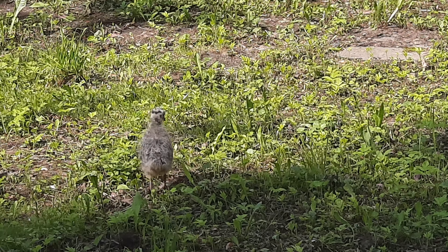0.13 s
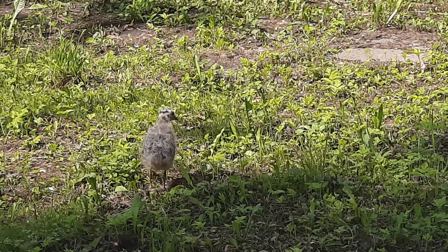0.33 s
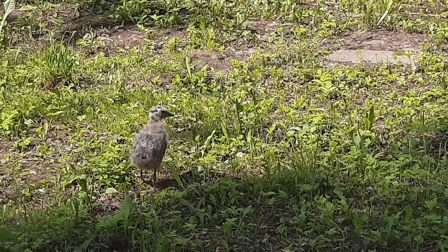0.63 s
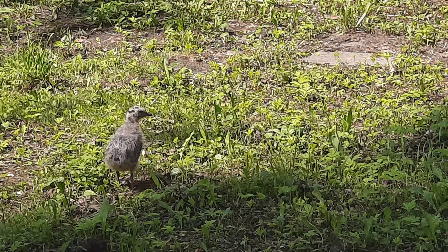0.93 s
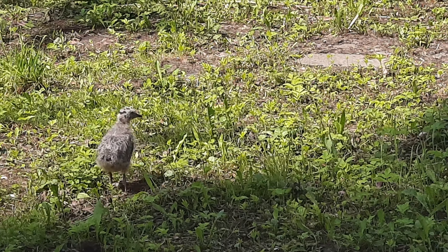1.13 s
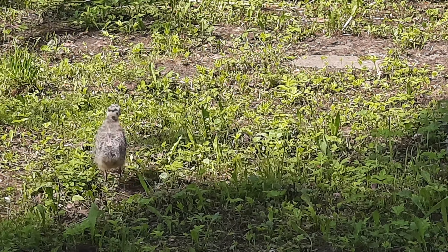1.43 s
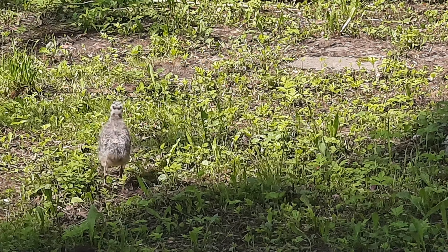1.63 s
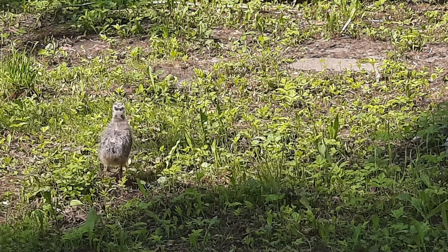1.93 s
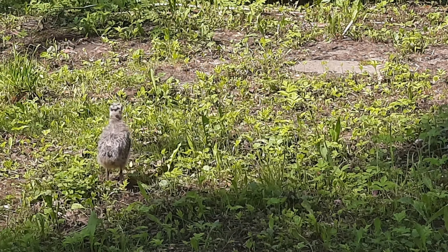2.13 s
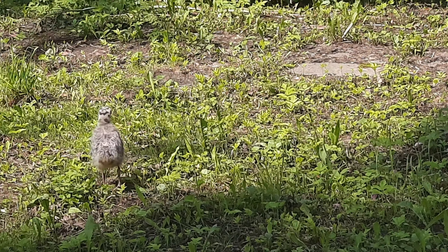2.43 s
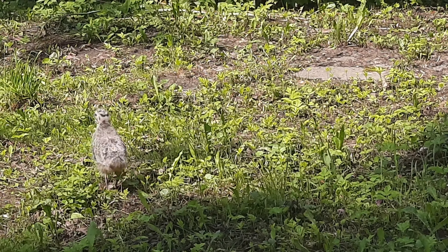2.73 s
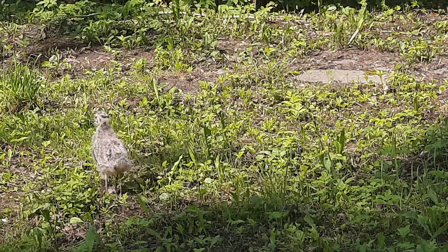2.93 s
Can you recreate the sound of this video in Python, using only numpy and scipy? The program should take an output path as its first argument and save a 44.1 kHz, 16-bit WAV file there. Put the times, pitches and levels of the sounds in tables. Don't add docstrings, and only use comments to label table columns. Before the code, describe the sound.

A gull's four harsh, gliding cries, each about 0.15-0.2 seconds, come at 0.5, 1.3, 2.0 and 2.5 seconds, with quick wall echo and a yard tail. A thin distant whistle sounds on the right at 0.9. A second gull on the left chuckles at 1.1-1.7, 2.4-2.5 and rapidly from 2.8. Low traffic rumble and hiss swell until 1.75, then hold; faint dry grass ticks come near 2.9-3.0.

```python
import sys
import numpy as np
from scipy import signal
from scipy.io import wavfile
from scipy.ndimage import uniform_filter1d, map_coordinates

SR = 44100
rng = np.random.default_rng(int(sys.argv[2]) if len(sys.argv) > 2 else 0)


def dump_mix(stems):
    frames = np.atleast_2d(stems).T
    limited = np.clip(frames, -1, 1)
    pcm = np.round(limited * 32767).astype(np.int16)
    wavfile.write(sys.argv[1], SR, pcm)


def to_linear_factor(level_db):
    exponent = np.asarray(level_db, float) / 20
    return 10 ** exponent


N = 136269

# time in seconds, pitch in Hz, effort in dB.
CRY_1 = [(.487, 1032, -39), (.495, 1107, -33), (.505, 1151, -34), (0.524, 1190, -31.5), (.531, 1235, -31.5),
         (.548, 1280, -34), (.573, 1250, -34), (.613, 990, -38), (.638, 813, -50)]
CRY_2 = [(1.288, 1098, -29), (1.3, 1249, -37.5), (1.312, 1281, -37.5), (1.346, 1333, -38),
         (1.44, 1135, -41.5), (1.452, 1067, -44), (1.47, 877, -47)]
CRY_3 = [(1.978, 1011, -55), (1.986, 1129, -38), (2.0, 1267, -35), (2.04, 1298, -34.5), (2.078, 1210, -39),
         (2.116, 1065, -43.5), (2.145, 842, -42)]
CRY_4 = [(2.522, 1056, -37), (2.532, 1207, -32.5), (2.55, 1285, -32), (2.584, 1304, -30), (2.63, 1201, -32),
         (2.663, 1082, -37), (2.672, 1010, -46.5), (2.687, 850, -32)]
# level in dB of multiple 1, 2, ..
BEAK = [(-14.5, 0, -11.5, -12.5, -7.5, -23, -24, -33.5, -28, -32, -41, -49),
        (-12, 3, -4, -12, -4, -14.5, -15.5, -32, -28, -25, -31, -35),
        (-12, 2.5, -4, -12.5, -6, -18.5, -30, -53, -36.5, -33.5, -33, -35),
        (-16, 3, -5, -15, -13.5, -21.5, -27, -48, -41, -53, -48, -54)]
# left-right in dB, dulling through it in dB per overtone, gain in dB.
FLIGHT = [(-0.5, 0, 1), (1, -0.26, 9), (1.5, -1, 6), (4, -0.3, 5.5)]
CRY_LEAD_MS = (.115, .195, .228, .128)
# frequency in Hz, left-right in dB.
BODY_SHADE = [(2700, 1), (3800, 1.5), (5000, -3.5), (6200, -3), (9000, -11.5), (13000, 6)]
# level in dB, brightness in dB per overtone, doppler ratio,
# left-right in dB, dulling in dB per overtone.
WALL = [(-19.5, 1.5, 1.002, 11, -0.5), (-11, 1, 1.005, 7, -0.6), (-9, 1.53, 1.012, 4.5, -0.6),
        (-9.5, 2.5, 1.024, 5, 0.4)]
WALL_DELAY_S = (.078, .079, .0665, .049)
# start in seconds, length in seconds, level in dB, pitch in Hz,
# brightness in dB per octave, squeak share 0-1.
CHUCKLE = [(1.141, 0.035, -47.5, 559, -1, .15), (1.225, 0.045, -48, 574, -1, 0.47),
           (1.52, 0.037, -47.5, 563, 0.5, .2), (1.574, 0.042, -47.5, 568, -0.5, 0.34),
           (1.629, 0.043, -51.5, 546, -2, 0.7), (2.403, 0.039, -44.5, 564, -1, 0.26),
           (2.495, 0.028, -43.5, 583, 1.5, 0.64), (2.771, 0.05, -44.5, 601, -2.5, 0.06),
           (2.826, 0.046, -44, 565, -6, 0.2), (2.89, .045, -45.5, 611, -11, 0.1),
           (2.949, 0.047, -48, 603, -9, 0.09), (3.026, 0.045, -48.5, 577, -13.5, 0.05)]
# frequency in Hz, level in dB.
CHUCKLE_THROAT = [(500, -30), (1800, -19), (2350, -2), (3000, 3), (3900, 0), (4800, -11), (6900, -6),
                  (15000, -34)]
# time in seconds, pitch in Hz, level in dB.
WHISTLE = [
    (.88, 4500, -68),
    (.92, 4850, -63),
    (.95, 4800, -64),
    (.99, 4450, -69),
]
# delay in seconds, level in dB.
NEAR_BOUNCES = [(.0011, -13), (.0027, -13), (.0064, -15), (.013, -16), (.021, -16), (.034, -15),
                (.047, -16)]
# frequency in Hz, time to fall 60 dB in seconds.
YARD_DECAY = [(500, 1), (2500, 1), (5000, 0.68), (9000, 0.49), (15000, 0.43)]
# time in seconds, level in dB.
TICKS = [(2.912, -59), (2.920, -53.5), (2.938, -58), (2.955, -61), (3.041, -61)]
# frequency in Hz, level in dB per Hz.
RUMBLE = [(28, -30), (42, -3.5), (75, 3), (130, -5), (230, -8.5), (320, -4.5), (420, -13), (840, -7.5)]
# frequency in Hz, level in dB per Hz.
HISS = [(840, 0), (1300, -5), (1800, -10), (3500, -21.5), (6800, -31), (10000, -45), (16000, -55.5)]
# time in seconds, level in dB.
NEARING = [(0, -37), (.45, -37), (.9, -35.5), (1.15, -32), (1.5, -29.5), (1.75, -29), (2.3, -29),
           (2.7, -29), (3.09, -29)]
# frequency in Hz, likeness 0-1.
TRAFFIC_LIKENESS = [(60, 0.92), (150, 0.95), (300, 1), (700, 0.18), (1400, 0.58), (3000, 0.25),
                    (15000, 0.037)]
# frequency in Hz, left-right in dB.
TRAFFIC_PAN = [(60, 2), (180, -0.5), (550, 2), (1650, 3.5), (4970, 1.5), (15000, -9)]
# frequency in Hz, level in dB.
DRONE = [(60, -46), (88, -44), (132, -52), (170, -49)]

EARS = np.array([.5, -.5])[:, None, None]
JITTER, FLICKER_DB, FLICKER_HZ, ROUGH_DB_PER_OCTAVE = .0016, .7, 60, 4.5
BREATH_DB, WALL_BREATH_DB, CHUCKLE_ROUGH_DB = -26, -22, -25
SMOOTH_S, BEAK_TURN_DB, BEAK_CLOSE_DB = .004, .5, 1
GAPE_HZ, GAPE_WIDTH_HZ, GAPE_DB = 5850, 400, 7
WALL_FADE_DB, WALL_LEAD_MS = -9, .372
SQUEAK_DB, SQUEAK_GAP_DB = 6, -14
CHUCKLE_ARCH, CHUCKLE_RISE_S = .035, .004
CHUCKLE_PAN_DB, CHUCKLE_LEAD_MS, CHUCKLE_WET_DB = 7.5, .41, -2
YARD_DB, YARD_PAN_DB, YARD_GAP_S, YARD_BRIGHT = -7, -1.5, .025, .45
LEAF_WOBBLE_MS, LEAF_HZ = .25, 60
TICK_HZ, TICK_WIDTH_HZ, TICK_S = 13600, 3000, .001
HISS_DB, RUMBLE_SHARE, HISS_SHARE = -7.5, .92, 1
TRAFFIC_LEAD_MS, PATCH_DB, SWELL_DB = .42, .6, .4
START_S, END_FADE_S, LOW_CUT_HZ = .073, .004, 43


def evened(x):
    return x / np.sqrt(np.mean(x ** 2) + 1e-20)


def read(points, hz):
    f, value = np.transpose(points)
    return np.interp(np.log(hz + 1), np.log(f + 1), value)


def add(mix, s, sound):
    part = mix[:, round(s * SR):][:, :sound.shape[1]]
    part += sound[:, :part.shape[1]]


def wander(t, rate_hz, shape):
    f = np.geomspace(.15, 1, 8) * rate_hz
    chance = rng.random((*shape, 8, 2))
    step = np.arange(0, len(t) + 32, 32)
    f = (f * (0.854 + 0.352 * chance[..., 0]))[..., None]
    slow = np.sin(2 * np.pi * (f * step / SR + chance[..., 1:])).sum(-2) / 2
    return np.repeat(slow, 32, -1)[..., :len(t)]


def stack(t, hz, tones_db, lead_ms, pan_db, noise_db):
    k = np.arange(1, len(tones_db) + 1)[:, None]
    turns = np.cumsum(hz * (1 + JITTER * wander(t, 117.0, ()))) / SR
    shift = EARS * lead_ms / 1000 * hz
    breath = uniform_filter1d(rng.standard_normal((2, len(k), len(t))), size=25) * 5
    breath = breath * to_linear_factor(noise_db + ROUGH_DB_PER_OCTAVE * np.log2(k))
    flicker = FLICKER_DB * np.minimum(k, 5) * wander(t, FLICKER_HZ, (2, len(k)))
    size = to_linear_factor(tones_db + flicker) * (k * hz < .38 * SR)
    waves = np.cos(2 * np.pi * (k * (turns + shift) + rng.random((len(k), 1))))
    tones = np.sqrt(2) * size * (1 + breath) * waves
    return (tones * to_linear_factor(pan_db * EARS)).sum(1)


def cries():
    out = np.zeros((2, N))
    curves = (CRY_1, CRY_2, CRY_3, CRY_4)
    for curve, beak, lead, flight, delay, wall in zip(curves, BEAK, CRY_LEAD_MS, FLIGHT, WALL_DELAY_S, WALL):
        pan, dull, gain = flight
        wall_db, bright, ratio, side, turn = wall
        s, hz, effort = np.transpose(curve)
        t = np.arange(s[0], s[-1], 1 / SR)
        k = np.arange(len(beak))[:, None] - 1
        part = (t - s[0]) / (s[-1] - s[0])
        pitch = uniform_filter1d(np.interp(t, s, hz), size=round(SMOOTH_S * SR), mode="nearest")
        edge = np.minimum(np.minimum(part, 1 - part) * 16, 1)
        gape = GAPE_DB * np.exp(-(((k + 1) * pitch - GAPE_HZ) / GAPE_WIDTH_HZ) ** 2)
        tones = np.array(beak)[:, None] + np.interp(t, s, effort) + gain + gape
        tones = tones + BEAK_CLOSE_DB * k * part ** 3

        direct = tones + dull * k * (2 * part - .6)
        direct_pan = pan + read(BODY_SHADE, (k + 1) * pitch) - BEAK_TURN_DB * k * part
        add(out, s[0], edge * stack(t, pitch, direct, lead, direct_pan, BREATH_DB))

        echo = tones + wall_db + (bright + turn * (2 * part - 1)) * k + WALL_FADE_DB * part ** 8
        echo = stack(t, pitch * ratio, echo, WALL_LEAD_MS, side, WALL_BREATH_DB)
        add(out, s[0] + delay, edge * echo)
    return out


def chuckle():
    out = np.zeros((2, N))
    k = np.arange(1, 27)[:, None]
    for start, length, db, hz, bright, share in CHUCKLE:
        t = np.arange(0, length, 1 / SR)
        arch = np.sin(np.pi * t / length)
        squeak = np.clip(3 - 3 * t / (1.28 * share * length), 0, 1)
        tones = read(CHUCKLE_THROAT, hz * k) + db + bright * np.log2(k / 5)
        tones = tones + squeak * np.where(k % 4, SQUEAK_GAP_DB, SQUEAK_DB)
        pitch = hz * (1 - CHUCKLE_ARCH * (1 - arch))
        note = stack(t, pitch, tones, CHUCKLE_LEAD_MS, CHUCKLE_PAN_DB, CHUCKLE_ROUGH_DB)
        add(out, start, note * np.clip(np.minimum(t, (length - t) / 2) / CHUCKLE_RISE_S, 0, 1))
    return out


def whistle():
    out = np.zeros((2, N))
    s, hz, db = np.transpose(WHISTLE)
    t = np.arange(s[0], s[-1], 1 / SR)
    note = stack(t, np.interp(t, s, hz), np.interp(t, s, db)[None], -0.1016, -17.0, BREATH_DB)
    add(out, s[0], note)
    return out


def near_bounces(x):
    taps = np.zeros((2, round(.06 * SR)))
    taps[:, 0] = 1
    for delay, db in NEAR_BOUNCES:
        at = np.round(delay * SR * rng.uniform(.85, 1.15, 2)).astype(int)
        taps[[0, 1], at] = to_linear_factor(db) * rng.choice([-1, 1], 2)
    return signal.fftconvolve(x, taps / np.linalg.norm(taps[0]), axes=1)[:, :N]


def yard(x):
    taps = np.zeros((2, SR))
    at = np.arange(round(YARD_GAP_S * SR), SR - 20, 20)
    at = at + rng.integers(0, 20, (2, SR // 20))[:, :len(at)]
    signs = rng.choice([-1., 1.], (2, SR // 20))[:, :at.shape[1]]
    np.put_along_axis(taps, at, signs, 1)
    hz, t, z = signal.stft(taps, SR, nperseg=256)
    decay = to_linear_factor(-60 * t / read(YARD_DECAY, hz)[:, None])
    tail = signal.istft(z * decay, SR, nperseg=256)[1]
    bright = signal.lfilter([1, -YARD_BRIGHT], [1], x)
    wet = signal.fftconvolve(bright, tail / np.linalg.norm(tail[0]), axes=1)[:, :N]
    stir = np.arange(N) + LEAF_WOBBLE_MS / 1000 * SR * wander(wet[0], LEAF_HZ, (2,)) / 4
    stir = uniform_filter1d(stir, size=64)
    wet = np.array([map_coordinates(w, [s], order=3) for w, s in zip(wet, stir)])
    return wet * to_linear_factor(YARD_PAN_DB * EARS[..., 0])


def ticks():
    out = np.zeros((2, N))
    t = np.arange(0, 5 * TICK_S, 1 / SR)
    edges = [TICK_HZ - TICK_WIDTH_HZ / 2, TICK_HZ + TICK_WIDTH_HZ / 2]
    band = signal.butter(2, edges, "band", fs=SR, output="sos")
    for s, db in TICKS:
        puff = evened(signal.sosfilt(band, rng.standard_normal((2, len(t)))))
        add(out, s - TICK_S, to_linear_factor(db) * puff * np.e * t / TICK_S * np.exp(-t / TICK_S))
    return out


def traffic():
    frames, hz = N // 256 + 5, np.fft.rfftfreq(1024, 1 / SR)
    a, b, c, d, patches = rng.standard_normal((frames, 513, 5)).T
    patches = uniform_filter1d(uniform_filter1d(patches, size=12, axis=0), size=12, axis=1)
    patches = evened(patches)
    t = np.arange(frames) * 256 / SR
    swell = wander(np.zeros(frames * 256), 15, ())[::256]

    same = np.clip(read(TRAFFIC_LIKENESS, hz), -1, 1)[:, None]
    left = a + 1j * b
    late = np.exp(-2j * np.pi * hz * TRAFFIC_LEAD_MS / 1000)[:, None]
    right = same * left * late + np.sqrt(1 - same ** 2) * (c + 1j * d)
    z = np.array([left, right]) * to_linear_factor(read(TRAFFIC_PAN, hz)[:, None] * EARS)

    low = hz < RUMBLE[-1][0]
    colour = np.where(low, read(RUMBLE, hz), read(HISS, hz) + HISS_DB)[:, None]
    level = np.interp(t, *np.transpose(NEARING))
    share = np.interp(np.log(hz + 1), np.log([60, 600, 6000]), [RUMBLE_SHARE, 1, HISS_SHARE])[:, None]
    z *= to_linear_factor(colour + share * (level - level.mean()) + PATCH_DB * patches + SWELL_DB * swell)
    noise = signal.istft(z, nperseg=1024, noverlap=768)[1][:, :N]
    return to_linear_factor(level.mean() + 1.0) * evened(noise)


def drone():
    t = np.arange(N) / SR
    hz, db = np.transpose(DRONE)[..., None]
    turns = np.cumsum(hz * (1 + 0.0496 * wander(t, 3, (len(DRONE),))), 1) / SR
    level = np.interp(t, *np.transpose(NEARING))
    throb_db = 2.9 * uniform_filter1d(wander(t, 5, (len(DRONE),)), size=64)
    size = to_linear_factor(db + level - level.max() + throb_db)
    return np.sqrt(2) * (size * np.sin(2 * np.pi * turns)).sum(0)


def scene():
    gull, other = cries(), chuckle()
    birds = near_bounces(gull + other) + whistle()
    tail = yard(to_linear_factor(YARD_DB) * gull + to_linear_factor(CHUCKLE_WET_DB) * other)
    return birds + tail + traffic() + drone() + ticks()


def top_cut(x):
    return signal.sosfilt(signal.butter(12, 15830, fs=SR, output="sos"), x)


def record(dry):
    low_cut = signal.butter(4, LOW_CUT_HZ, "high", fs=SR, output="sos")
    cut = signal.sosfilt(low_cut, dry)
    opened = np.arange(N) > START_S * SR
    fade = np.minimum(np.arange(N)[::-1] / (END_FADE_S * SR), 1)
    return top_cut(cut * opened * fade)


dry = scene()
out = record(dry)
dump_mix(out)
```